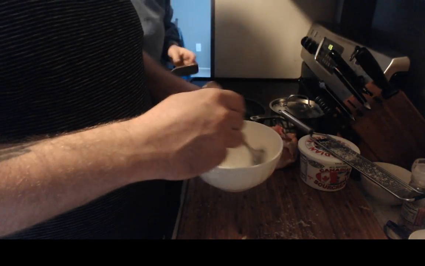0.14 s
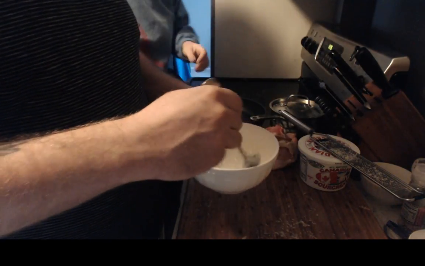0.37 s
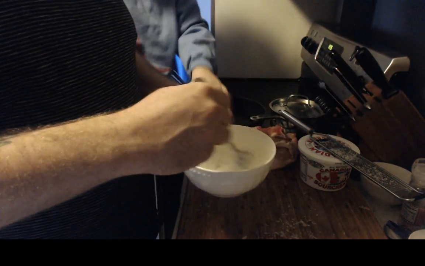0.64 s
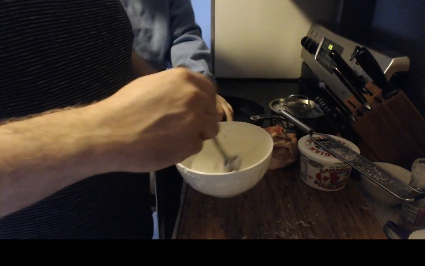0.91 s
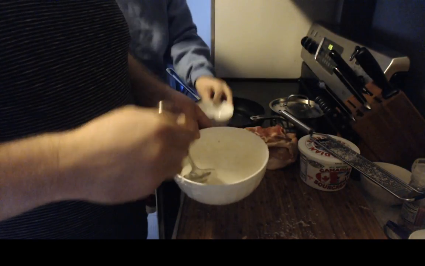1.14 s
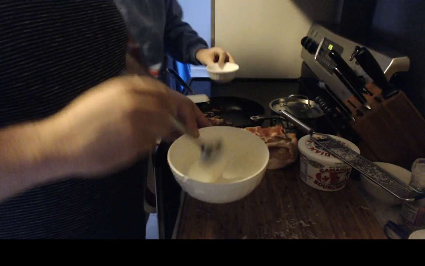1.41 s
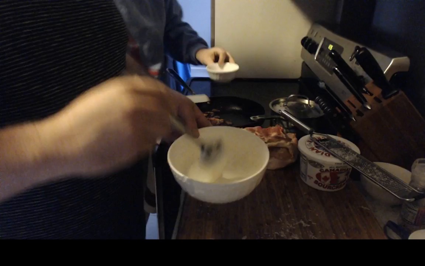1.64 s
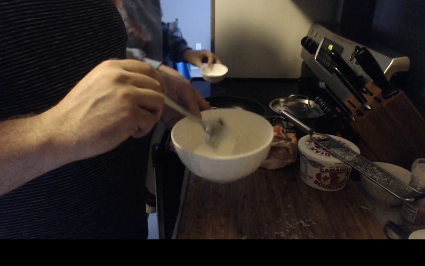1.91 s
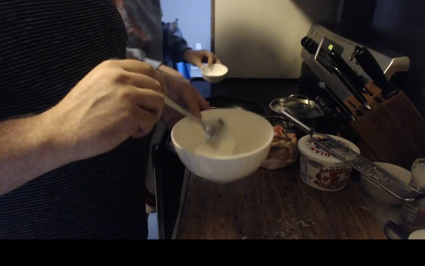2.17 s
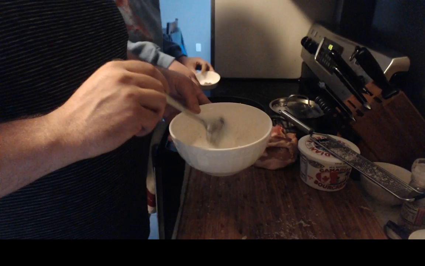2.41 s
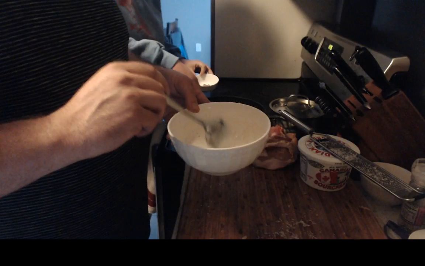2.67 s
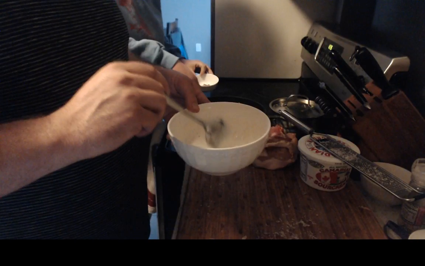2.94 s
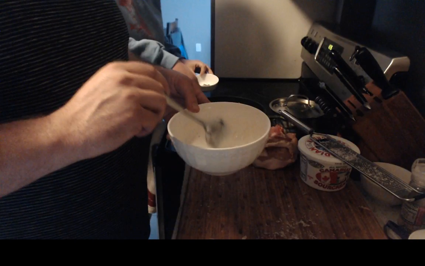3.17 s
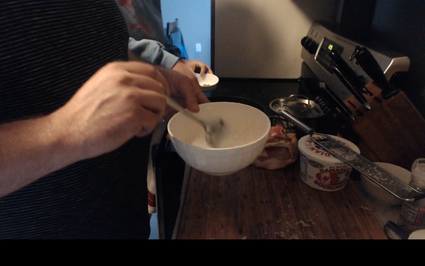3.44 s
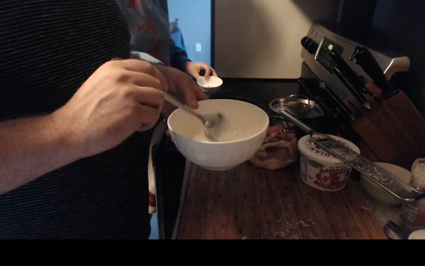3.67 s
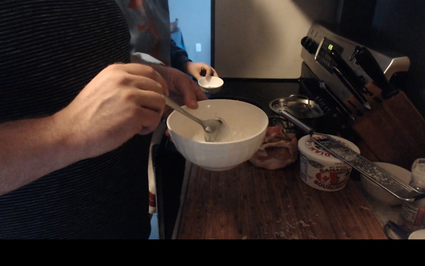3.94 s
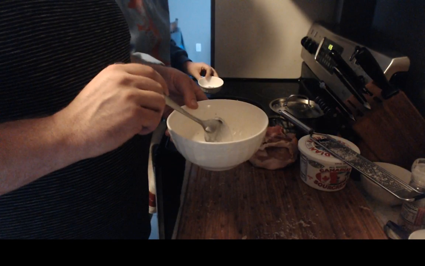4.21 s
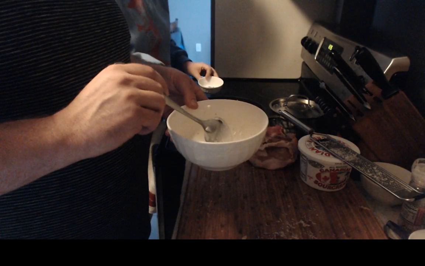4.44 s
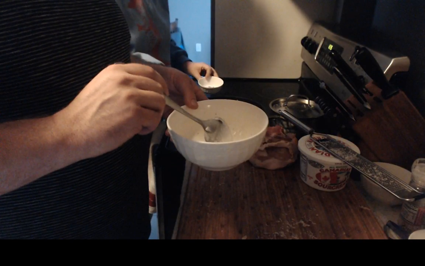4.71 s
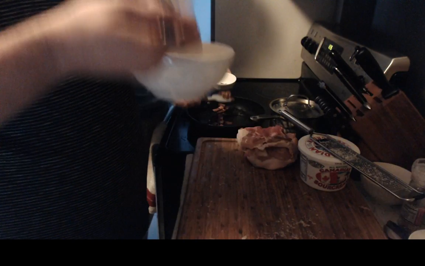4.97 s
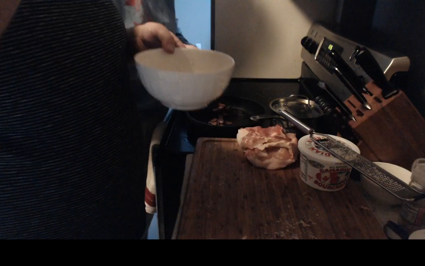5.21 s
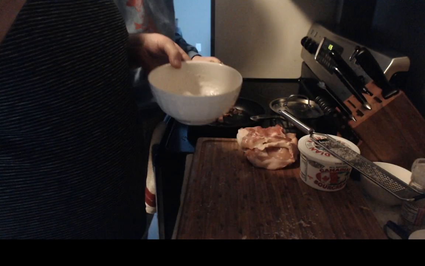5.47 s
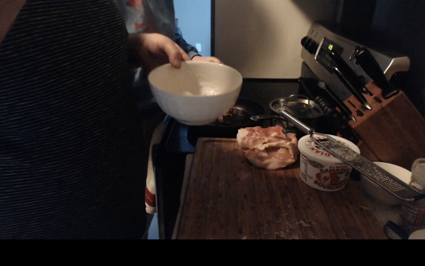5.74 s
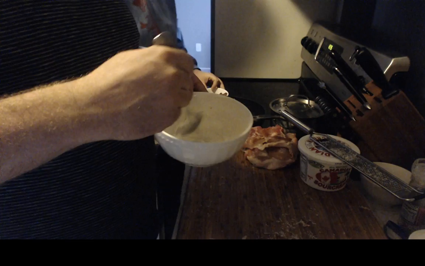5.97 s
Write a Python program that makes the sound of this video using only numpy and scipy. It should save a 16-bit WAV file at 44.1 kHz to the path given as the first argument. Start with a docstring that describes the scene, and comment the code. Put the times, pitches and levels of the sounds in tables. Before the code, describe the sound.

A metal spoon scrapes and clinks in a hand-held ceramic bowl in a small kitchen, with sharp distant dish raps and faint fan hiss.

```python
"""In a small kitchen a metal spoon scrapes and taps a hand-held ceramic bowl, over the hiss of a fan.
Further back a small dish is rapped four times and something dull is set down; hard walls throw it all back.
Struck things are dying sines plus bursts of noise, the scrape is tiny slips that also ring the spoon, the fan
is shaped noise; a faint wavering tone and a tiny chirp are swept and steady sines.
A noise suppressor lets the hiss swell with each sound and sink again in the pauses."""
import sys
import numpy as np
from scipy import signal
from scipy.fft import rfft, irfft
from scipy.io import wavfile
from scipy.ndimage import uniform_filter1d

SR = 44100
rng = np.random.default_rng(int(sys.argv[2]) if len(sys.argv) > 2 else 0)


def store_wav(level_fs):
    """Save 16-bit WAV to argv[1]."""
    pcm = np.round(np.clip(np.atleast_2d(level_fs), -1, 1) * 32767)
    wavfile.write(sys.argv[1], SR, pcm.T.astype(np.int16))


def level_to_linear(level):
    """Convert decibel levels to linear amplitude factors, elementwise."""
    exponent = np.asarray(level, float) / 20
    return 10 ** exponent


N = 269251

# the spoon's modes: f/Hz, level/dB, free t60/s
SPOON_MODES = [(1120, -7, .08), (1880, -14, .08), (2370, -2, .12), (3080, -2, .1), (4600, -5, .1),
               (5290, -6, .1), (6560, -14, .08), (7550, -11, .09), (8250, -13, .07), (9430, -11, .09),
               (10700, -16, .07), (11500, -12, .09), (13150, -17, .07), (14550, -22, .06),
               (15450, -22, .06)]


def evened(x):
    """Scales to rms 1."""
    return x / np.sqrt(np.mean(x ** 2) + 1e-20)


def read(points, hz):
    """Reads the second column of a table on a log-frequency axis."""
    f, value = np.transpose(points)
    return np.interp(np.log(hz + 1), np.log(f + 1), value)


def add(mix, s, sound):
    """Mixes a sound in at time s."""
    part = mix[round(s * SR):][:len(sound)]
    part += sound[:len(part)]


def levelled(x, size):
    """Evens out the broad humps that chance leaves in the spectrum of a short noise."""
    spectrum = rfft(x, 2 * len(x))
    humps = np.sqrt(uniform_filter1d(abs(spectrum) ** 2, size) + 1e-20)
    return irfft(spectrum / humps)[:len(x)]


def coloured(x, points, bright=0.):
    """Filters x by a spectrum, tilted about 3 kHz by bright dB per octave, and scales it to rms 1."""
    hz = np.fft.rfftfreq(len(x), 1 / SR)
    tilt_db = bright * np.log2(hz / 3000 + 0.0015321)  # the offset keeps 0 Hz finite
    return evened(irfft(rfft(x) * level_to_linear(read(points, hz) + tilt_db), len(x)))


def ring(modes, bright=0., length=0.84, favoured_hz=3000, favour_db=0., contact_s=0.000067):
    """Dying sines that swell over the contact time; the spot struck favours some modes."""
    hz, db, t60 = np.transpose(modes)[:, :, None]
    t = np.arange(SR // 3) / SR
    # every blow also varies the modes by chance, 0.8 dB
    share_db = db + bright * np.log2(hz / 3000) + .8 * rng.standard_normal(hz.shape)
    share_db += favour_db * np.exp(-(np.log2(hz / favoured_hz) / 0.2) ** 2)
    sign = (-1) ** np.arange(len(hz))[:, None]  # neighbouring modes start in opposite directions
    decay = level_to_linear(share_db - 60 * t / (t60 * length))
    waves = sign * decay * np.sin(2 * np.pi * hz * t)
    return waves.sum(0) * (1 - np.exp(-t / contact_s))


def crack(colour, db, bright, t60):
    """A short burst of contact noise that dies away over t60, with its peak at db."""
    t = np.arange(4096) / SR
    burst = levelled(rng.standard_normal(len(t)) * level_to_linear(-60 * t / t60), size=40)
    padded = np.r_[burst, burst * 0]
    burst = coloured(padded, colour, bright)[:len(t)] * (1 - np.exp(-t / 0.00021))
    return level_to_linear(db) * burst / abs(burst).max()


def fan():
    """Air hiss: random short-time spectra with faint drifting patches."""
    # colour of the hiss: f/Hz, relative level/dB per Hz
    hiss_colour = [(40, -33), (90, -15.5), (150, -16), (200, 1.5), (280, -10), (335, -3), (450, -11.5),
                   (1000, -7.5), (1650, -4), (2300, -9), (3350, -3), (4600, -15), (6450, -15.5),
                   (9000, -27.5), (11500, -39.5), (15000, -53)]
    frames, hz = N // 256 + 5, np.fft.rfftfreq(1024, 1 / SR)
    real, imaginary, patches = rng.standard_normal((frames, 513, 3)).T
    patches = evened(uniform_filter1d(uniform_filter1d(patches, 10, 0), 14, 1))
    level_db = read(hiss_colour, hz)[:, None] + .7 * patches
    hiss = signal.istft((real + 1j * imaginary) * level_to_linear(level_db), nperseg=1024, noverlap=768)[1]
    return evened(hiss[:N]) * level_to_linear(-50)


def stroke():
    """Pressure and squeak over time: every stroke leans in and lets go along one rounded shape."""
    # spoon sliding along the glaze: peak t/s, pressure level/dB, rise/s, fall/s, squeak level/dB
    slides = [(0.1, -73.5, 0.01288, 0.04636, -76), (0.188, -65, 0.083, 0.039, -47.5),
              (0.287, -69, 0.0458, 0.03678, -74), (0.418, -66.5, 0.08321, 0.0924, -53.5),
              (0.5, -97.5, 0.0398, 0.12, -66.5), (0.84, -74, 0.14558, 0.259, -68.5),
              (5.292, -57.5, 0.003746, 0.0171, -70.5), (5.361, -62.5, 0.013, 0.08933, -76),
              (5.5, -73, 0.045, 0.03654, -73.5), (5.69, -60, 0.07899, 0.02588, -77.5),
              (5.776, -65, 0.0617, 0.0481, -85.5), (5.925, -66, 0.1111, 0.04306, -58),
              (6.007, -59, 0.02465, 0.03003, -80.5), (6.045, -75, 0.0311, 0.03493, -78.5)]
    fade_db, bend = 19, 1.6  # drop over one rise or fall, roundness of the shape
    squeak_width = .5  # squeak time as a share of the stroke
    t, pressure, squeak = np.arange(N) / SR, 0, 0
    for s, db, rise, fall, squeak_db in slides:
        away = np.maximum((s - t) / rise, (t - s) / fall)
        pressure = pressure + level_to_linear(db - fade_db * away ** bend)
        squeak = squeak + level_to_linear(squeak_db - fade_db * (away / squeak_width) ** bend)
    return pressure, squeak


def scrape():
    """Dense tiny slips under the stroke hiss on the glaze and ring the spoon; the moving grip wakes modes in turn."""
    # colour of the slip noise: f/Hz, relative level/dB per Hz
    grit_colour = [(500, -8), (1500, 22.5), (3000, 20), (6000, 24), (10000, 24.5), (16000, 26.5)]
    slips_per_s, squeak_mode = 8000, 2  # the second is the index of the spoon mode that squeaks
    slide_tilt_db = -0.5  # per octave above 6 kHz
    damped_share = .35  # share of the spoon's free ring time left while it slides
    t = np.arange(N) / SR
    pressure, squeak = stroke()
    sizes = level_to_linear(3 * np.minimum(rng.exponential(1, N), 3))
    slips = evened(rng.standard_normal(N) * sizes * (rng.random(N) < slips_per_s / SR))
    out = level_to_linear(3.5) * pressure * coloured(slips, grit_colour)
    steps = np.arange(0, t[-1] + 1, .04)  # the grip wanders from step to step, s
    for k, (hz, db, t60) in enumerate(SPOON_MODES):
        grip = level_to_linear(4.4 * np.interp(t, steps, rng.standard_normal(len(steps))))
        drive = level_to_linear(4.5 + slide_tilt_db * np.log2(hz / 6000)) * pressure * grip
        if k == squeak_mode:
            drive = drive + squeak
        r = 1000 ** (-1 / (damped_share * t60 * SR))  # resonator pole radius
        poles = [1, -2 * r * np.cos(2 * np.pi * hz / SR), r * r]
        mode = evened(signal.lfilter([1, 0, -1], poles, slips))
        out += level_to_linear(db) * drive * mode
    return out


def hits():
    """Each touch rings bowl and spoon, and cracks; the crack follows brightness more than the rings do."""
    # spoon meets bowl: t/s, crack level/dB, bowl ring level/dB, spoon ring level/dB, f/Hz favoured by the spot
    touches = [(.089, -34.5, -50.5, -56, 826.3), (.294, -43, -62, -55.5, 3066),
               (0.349, -37.5, -49.5, -51, 888), (0.493, -40, -53, -61, 905.6),
               (.688, -45, -40.5, -41.5, 6136), (0.7106, -23, -38, -28.5, 1100),
               (0.716, -27, -41, -34.5, 5053), (.75, -36, -42.5, -49, 1102),
               (4.875, -60, -72.5, -59.5, 4857), (4.929, -52.5, -74.5, -71, 9430),
               (5.1915, -18.5, -19, -40, 8000), (5.2005, -30, -28, -45, 4000),
               (5.283, -15.5, -28, -36.5, 8771), (5.326, -74.5, -78, -60.5, 7550),
               (5.3551, -20, -47, -39, 4861), (5.68, -47.5, -72.5, -50.5, 9430),
               (5.821, -46, -50.5, -48.5, 3080), (5.828, -41, -50.5, -62.5, 864.2),
               (5.917, -44, -60.5, -53.5, 5310), (5.998, -34.5, -47.5, -48, 8948),
               (6.006, -58.5, -55, -68.5, 5578)]
    # the bowl's modes: f/Hz, level/dB, free t60/s
    bowl_modes = [(888, -5, .25), (2223, -3, .25), (3908, -8, .2), (4102, -9, .09), (5580, -11, .1),
                  (6050, -7, .12), (6735, -15, .1), (7150, -15, .1), (8440, -7, .06), (11010, -17, .05),
                  (11900, -20, .1), (13550, -27, .12)]
    # contact noise: f/Hz, relative level/dB per Hz
    crack_colour = [(180, -46), (300, -99), (689, 4.5), (2320, 4), (3460, -4), (5520, 1.5), (6740, -2),
                    (11700, -6.5), (16000, -30)]
    bright_db, neutral_hz = 2.5, 3500  # tilt per octave that the favoured pitch lies above neutral
    grip_share = 0.48  # share of the spoon's free ring time that the fingers leave
    rings, cracks = np.zeros((2, N))
    for s, crack_db, bowl_db, spoon_db, hz in touches:
        bright = bright_db * np.log2(hz / neutral_hz)
        # soft touches stay in contact and damp the bowl: 0.7 of its free ring time at -17.5 dB
        length = max(.7 + .015 * (bowl_db + 17.5), .15)
        add(rings, s, level_to_linear(bowl_db) * ring(bowl_modes, 0., length, hz, favour_db=15.5))
        add(rings, s, level_to_linear(spoon_db) * ring(SPOON_MODES, 0.28 * bright, grip_share, hz, favour_db=13.0))
        add(cracks, s, crack(crack_colour, crack_db, bright, 0.035))
    return rings, cracks


def tones():
    """Two faint sines: a low one that sags in pitch with a deepening waver in level, and a tiny high chirp."""
    # breakpoints of the low tone: t/s, f/Hz, level/dB
    sagging = [(0.82, 502, -63), (1.1, 490, -67), (1.4, 466, -68)]
    # the chirp, a single row: t/s, f/Hz, level/dB, length/s
    chirp = (4.37, 10900, -68, .065)
    waver_db, wavers_per_s = 4, 7.3  # the depth is reached at the end of the tone
    out = np.zeros(N)
    s, hz, db = np.transpose(sagging)
    t = np.arange(s[0], s[-1], 1 / SR)
    waver = np.sin(2 * np.pi * wavers_per_s * (t - s[0])) * (t - s[0]) / np.ptp(s)
    level_db = np.interp(t, s, db) + waver_db * waver
    phase = 2 * np.pi * np.cumsum(np.interp(t, s, hz)) / SR
    wave = np.sin(phase) * signal.windows.tukey(len(t), .2)
    add(out, s[0], np.sqrt(2) * level_to_linear(level_db) * wave)
    s, hz, db, length = chirp
    t = np.arange(0, length, 1 / SR)
    add(out, s, level_to_linear(db) * np.sin(2 * np.pi * hz * t) * np.bartlett(len(t)) ** 2)
    return out


def knocks(blows, modes, contact_s, favour_db, clack_db):
    """Short damped blows on one object, each a ring of its modes with a clack of contact noise."""
    # contact noise: f/Hz, relative level/dB per Hz
    clack_colour = [(240, -49), (400, -30.5), (1180, 3.5), (3370, -8), (3690, -2.5), (5430, -9.5),
                    (7170, -7), (9920, -3), (16000, -24)]
    out = np.zeros(N)
    for s, db, bright, hz in blows:
        # 0.92023 is the share of the free ring time left
        add(out, s, level_to_linear(db) * ring(modes, bright, 0.92023, hz, favour_db, contact_s=contact_s))
        add(out, s, crack(clack_colour, db + clack_db, bright, 0.012))
    return out


def dish_raps():
    """Four raps on a small dish whose many modes die within milliseconds."""
    # raps: t/s, level/dB, brightness/dB per octave, favoured f/Hz
    raps = [(1.8158, -4, 0.4437, 4150), (2.0657, -13, 0, 3600), (2.2034, -10.5, 0.0236, 1645),
            (2.3406, -13.5, -0.8212, 3600)]
    # the dish's modes: f/Hz, level/dB, free t60/s
    dish_modes = [(661.08, -8, 0.009177), (1101.9, 0.5, 0.007941), (1332.8, -9, 0.0092),
                  (1691.6, -11.5, 0.014244), (2289.6, -8.5, .006), (2727.6, -9, 0.010298),
                  (3025.2, -5.5, 0.0072), (3600, -2, 0.0064), (4150, -4, 0.01), (4664.4, -2, 0.008981),
                  (5708.5, -11.5, 0.0051), (7248.7, -1, 0.0092), (7894, -13.5, 0.0059),
                  (9696.4, -1.5, 0.0013), (11870, -2, 0.0011)]
    return knocks(raps, dish_modes, contact_s=0.000068, favour_db=0.5, clack_db=2.0)


def board_thuds():
    """Something dull set down: a longer contact and lower modes, with little clack."""
    # set-downs: t/s, level/dB, brightness/dB per octave, favoured f/Hz
    set_downs = [(4.79, -34, 0, 750), (4.794, -24, -1.5, 1100), (4.808, -42, -6.5, 750),
                 (4.944, -46.5, -5.5, 2050), (4.9485, -22.5, 12, 2050), (4.953, -33.5, -2, 4640),
                 (4.963, -46, -7.5, 2350)]
    # the board's modes: f/Hz, level/dB, free t60/s
    board_modes = [(345.3, -25.5, 0.019), (560.37, -3.5, 0.01448), (750, -1.5, 0.02943), (1100, 0, 0.00603),
                   (1419, -20.5, .02), (1649.5, -8.5, 0.03128), (2050, -3, 0.02416), (2350, -4.5, 0.02532),
                   (3326.6, -22, 0.01832), (4640, -20.5, 0.02233)]
    return knocks(set_downs, board_modes, contact_s=0.0001208, favour_db=9.5, clack_db=-26)


def room(x, echo_db, tail_db):
    """Direct sound, coloured early echoes, then sparse taps that die band by band."""
    # first reflections, each coloured by the surface it leaves: delay t/s, level/dB, centre f/Hz
    reflections = [(.0052, -8, 1100), (.0068, -1, 3900), (.0073, -7, 1100), (.008, -8, 9500),
                   (.0097, -6, 4300), (.013, -10, 1000), (.0153, -5, 4300), (.016, -10, 7500),
                   (.0177, -7, 4000), (.024, -10, 2000)]
    # decay of the kitchen: f/Hz, t60/s
    kitchen_decay = [(300, 0.059), (800, 0.22985), (2000, 0.14329), (5500, 0.17059), (14000, 0.11)]
    # colour of the late sound: f/Hz, level/dB
    tail_colour = [(300, 9), (1000, 0), (4000, 4), (8000, -1), (15000, -7.5)]
    taps = np.zeros(SR // 2)
    at = np.arange(40, SR // 2 - 12, 12)  # one tap of random sign somewhere in every 12 samples
    taps[at + rng.integers(0, 12, len(at))] = rng.choice([-1., 1.], len(at))
    hz, t, bands = signal.stft(taps, SR, nperseg=128)
    decay = level_to_linear(-60 * t / read(kitchen_decay, hz)[:, None])
    dying = signal.istft(bands * decay, SR, nperseg=128)[1]
    tail = coloured(levelled(dying, size=250), tail_colour)
    response = level_to_linear(tail_db) * tail / np.linalg.norm(tail)
    response[0] += 1  # direct sound
    for delay, db, hz in reflections:
        window = np.hanning(round(2 * SR / hz))  # two cycles: about an octave wide
        wave = np.sin(2 * np.pi * hz * np.arange(len(window)) / SR)
        add(response, delay, level_to_linear(db + echo_db) * 2 * window * wave / window.sum())
    return signal.fftconvolve(x, response)[:N]


def scene():
    """Near bowl, far dish and board, each with its own share of the room, over the fan and the faint tones."""
    rings, cracks = hits()
    near = room(rings, echo_db=-15, tail_db=-12)
    near += room(cracks + scrape(), echo_db=-4, tail_db=-1)
    dish = room(dish_raps(), echo_db=0, tail_db=0.5)
    # small objects send out little below 516 Hz
    radiation = signal.butter(4, 515.69, "high", fs=SR, output="sos")
    small = signal.sosfilt(radiation, near + dish)
    board_band = signal.butter(2, (200, 7000), "band", fs=SR, output="sos")
    board = signal.sosfilt(board_band, room(board_thuds(), echo_db=-12, tail_db=-3.5))
    return (small + board + fan() + tones())[None]


def suppressor(x):
    """Gain that opens while something stands above the floor and closes slowly afterwards."""
    shut_db, trigger_db = -12, 2  # gain when shut, threshold above the median (the floor)
    open_s, close_s = 0.10804, 0.5356
    hop = SR // 100
    power = uniform_filter1d(np.diff(x) ** 2, 3 * hop)[::hop]  # the difference favours the treble
    power_db = 10 * np.log10(abs(power) + 1e-14)
    below_db = np.median(power_db) + trigger_db - power_db
    busy = 1 / (1 + np.exp(np.clip(below_db, -50, 50)))
    opening, state = np.zeros(len(busy)), 1  # starts fully open
    for k, share in enumerate(busy):
        opening[k] = state
        state += hop / SR * (share * (1 - state) / open_s - (1 - share) * state / close_s)
    smooth = np.interp(np.arange(len(x)), hop * np.arange(len(busy)), opening)
    return level_to_linear(shut_db * (1 - smooth))


def top_cut(x):
    """Nothing passes above the cut-off."""
    return signal.sosfilt(signal.butter(12, 16860, fs=SR, output="sos"), x)


def record(dry):
    """The small microphone drops the deep bass and the top; then the noise suppressor rides the level."""
    thin = signal.sosfilt(signal.butter(2, 90, "high", fs=SR, output="sos"), dry)
    thin = signal.oaconvolve(thin, signal.firwin(255, 16200, fs=SR)[None], "same")
    finished = thin * suppressor(thin[0])
    return top_cut(finished)


dry = scene()
out = record(dry)
store_wav(out)
```